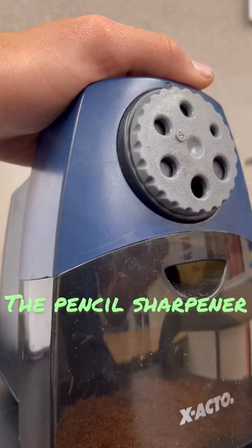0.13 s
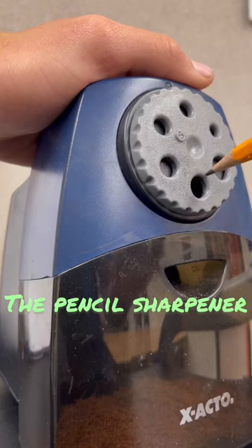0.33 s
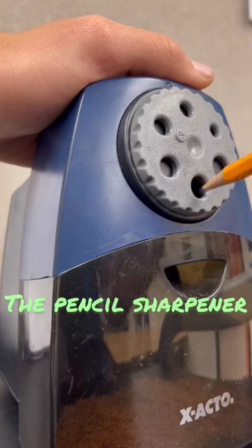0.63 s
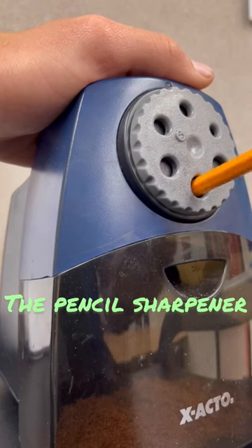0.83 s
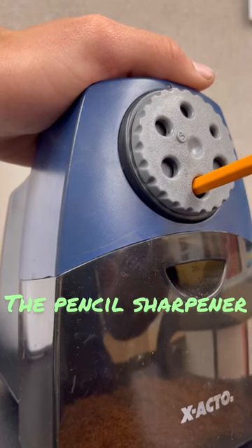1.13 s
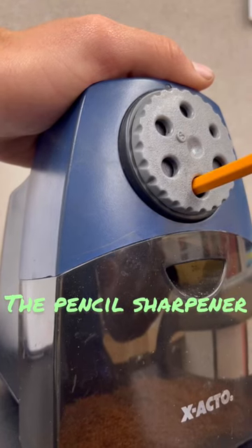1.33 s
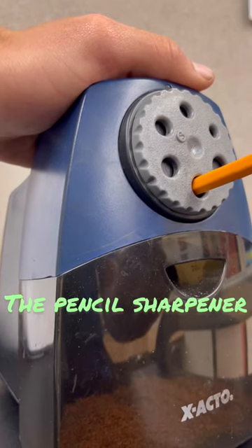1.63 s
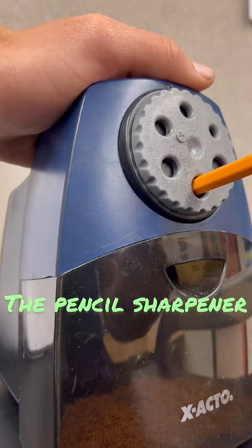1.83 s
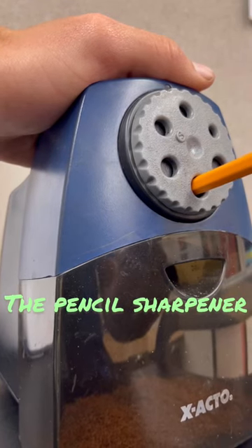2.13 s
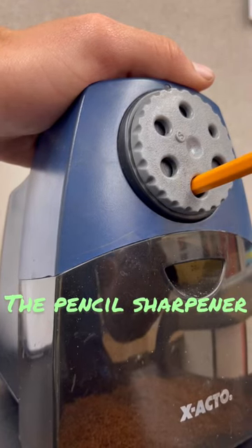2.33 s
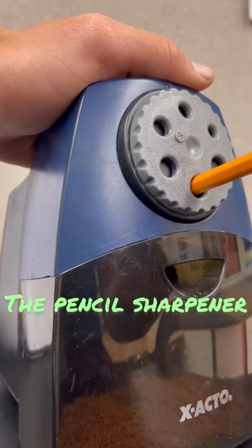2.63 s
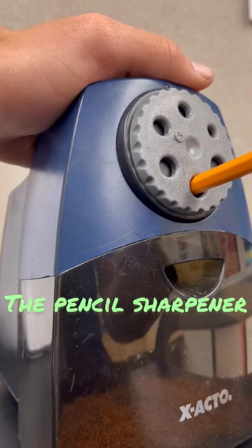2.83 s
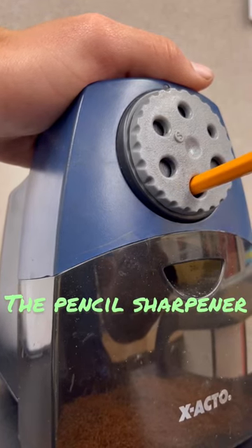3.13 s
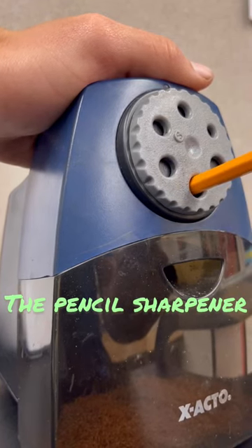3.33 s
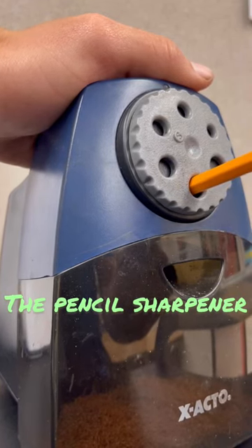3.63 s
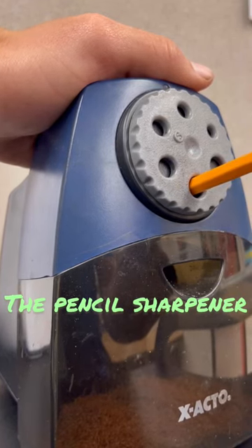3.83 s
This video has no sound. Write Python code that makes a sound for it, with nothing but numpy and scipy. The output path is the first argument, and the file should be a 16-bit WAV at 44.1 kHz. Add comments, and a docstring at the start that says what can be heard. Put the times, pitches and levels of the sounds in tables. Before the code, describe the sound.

An electric pencil sharpener taps, clicks on, then grinds a pencil loudly and steadily, close up

```python
"""An electric pencil sharpener, close to a pair of microphones in a quiet room.
A pencil taps the plastic dial, scrapes in and trips the switch: clicks ring damped sines and shape noise.
The motor hums as a wavering sine and the gears whine as resonant noise over a faint tooth-mesh tone.
The cutter circles about 7.7 times a second. Its flutes tear off chips, heard as showers of clicks,
and knock the plastic housing into resonance, harder on one side of every turn.
"""
import sys
import numpy as np
from scipy import signal
from scipy.fft import rfft, irfft
from scipy.io import wavfile

SR = 44100
rng = np.random.default_rng(int(sys.argv[2]) if len(sys.argv) > 2 else 0)


def output_pcm(signal):
    """Save a mono or channel-first signal as 16-bit PCM at the path in sys.argv[1].

    Samples are clipped to [-1, 1] before scaling.
    """
    pcm = np.clip(np.atleast_2d(signal).T, -1, 1) * 32767
    wavfile.write(sys.argv[1], SR, np.round(pcm).astype(np.int16))


N = 176400
TIME = np.arange(N) / SR
PAIR = (2, N)  # two rows per source: what both ports share, and what differs

# Room floor: (frequency [Hz], relative density [dB per Hz])
ROOM_TONE = [(15, -34), (25, -4), (140, -6), (182, -15), (244, -4), (271, -13), (616, -11), (703, -20),
             (940, -17.5), (2310, -52), (14000, -55)]
ROOM_TONE_DB = -59.5

# Pencil on plastic, then the switch:
# (time [s], relative level [dB], treble against middle [dB], bass against middle [dB])
TAP_EVENTS = [(0.34, -27.5, -10, 2), (0.513, -53.5, -14, 2), (.678, -39, -10, -5), (0.7546, -27, 8, -6),
              (0.7906, -26.5, 17.5, -6)]
# What a tap rings with: (frequency [Hz], relative level [dB], 60 dB decay [s])
TAP_MODES = [(290, -8.5, 0.12), (427, -6.5, .07), (610, 2, 0.075), (804, 5, 0.029), (1090, 5.5, 0.032),
             (1575, -3, 0.028), (1900, -0.5, 0.025), (2380, 2, 0.0082), (3600, -8, 0.0093)]
# Bright crack of plastic or wood: (frequency [Hz], relative level [dB])
CRACK = [(1500, -11), (3200, 2.5), (4700, -3), (7000, 0), (10000, 1.5), (13000, -16), (16000, -43)]
# Faint tail of a tap in the room: (frequency [Hz], relative level [dB])
ROOM_COLOUR = [(200, 7), (2200, -3), (3000, -23), (7500, -28), (12000, -40)]
TAP_BODY_DB, CRACK_DB, TAIL_DB = -27, -11.5, -18
CONTACT_T60_S, CRACK_T60_S, ROOM_T60_S = 0.045, 0.035, 0.25

SLIDE_FROM_S, SLIDE_TO_S, SLIDE_DB = 0.68, 0.80, -63.5

# Motor start, then the cutter's bite
MOTOR_ON_S, SPIN_UP_S, BITE_S, BITE_RISE_S = 0.776, 0.043, 0.854, 0.068
HUM_HZ, HUM_DB, SHAKE_DB = 67.3, -51.5, -56
JOLT_S, JOLT_LENGTH_S, JOLT_DB = 0.925, 0.045, 13  # the motor strains as the cutter bites

# Cutter speed: (time [s], rate [turns per s])
TURN_RATE = [(.8, 7.85), (1.4, 7.74), (2.0, 7.63), (3.0, 7.63), (3.5, 7.68), (4.0, 7.72)]
TURN_ANCHOR_S, TURNS_AT_ANCHOR = 1.0, -0.085  # the turn count at this time
# Source levels while cutting, before trim and swing:
# (time [s], housing level [dB], gears level [dB], rasp level [dB], chips level [dB])
LOAD = [(0.95, -20.5, -23.5, -23, -29), (1.05, -19.5, -28, -24, -31), (1.2, -21, -24, -21.5, -29.5),
        (1.35, -19.5, -25, -21, -25.5), (1.55, -21.5, -25.5, -21.0, -28.5), (1.75, -21.5, -20, -23, -30),
        (1.9, -22, -24.5, -21.5, -28.5), (2.05, -20.5, -24, -22.5, -30.5), (2.25, -20, -21, -23.5, -29),
        (2.45, -21, -27, -19, -27), (2.65, -20.5, -28, -22, -27.9), (2.85, -22, -26.5, -21, -29.5),
        (3.1, -20.5, -27.5, -23, -29.3), (3.35, -22, -27, -22, -31.5), (3.55, -23.4, -24.5, -24.5, -32.1),
        (3.75, -24.5, -25.5, -24, -32.5), (3.9, -23, -24.5, -24, -32.5), (4.0, -23, -26.5, -22.5, -31)]
# Swing within one turn: (position [share of a turn], cutting [dB], gears [dB], housing [dB])
TURN_SWING = [(.1, 3, 1.5, 3.5), (.25, 2.5, -5, 2), (.4, 1, -1.5, 3), (.57, -1, 4.5, 0.6),
              (.72, -3.5, -1, -0.3), (.87, 1.5, -1.5, 0.5)]
# How unevenly the pencil is cut: (time [s], cutting swing [share])
WOBBLE = [(1.0, 0.067), (1.5, 0.22), (2.0, 0.88), (2.65, 1.23), (3.2, 1.36), (4.0, 0.54)]
ROLLS_PER_TURN, ROLL_DB = 4.56, 1.2

GEAR_HZ, GEAR_WIDTH_HZ, TEETH_PER_TURN = 1215.4, 40, 140
WHINE_DB, MESH_DB, GEARS_IDLE_DB = -2.5, -10.5, -15

FLUTES_PER_TURN, FLUTE_JITTER, FLUTE_SPREAD_DB = 56, 0.3, 2.5  # jitter in flute spacings

# Housing resonances: (frequency [Hz], width [Hz], relative level [dB])
HOUSING_MODES = [(118, 28, -15), (170.3, 12, -3.5), (193.6, 9.8, 3), (201.2, 14.8, 0), (231, 41, -3.5),
                 (274, 34, -3), (318.5, 18, -4.5), (354.5, 14.7, -2), (446, 67, -10.5), (594.3, 31, -4.5),
                 (843, 47, -12.5)]
# Lowest housing resonances: (time [s], added level [dB])
BOOM = [(1.0, -2.5), (1.7, 0.5), (2.1, 1.5), (2.8, 5), (3.3, 2.5), (3.7, -4)]
BOOM_BELOW_HZ, HOUSING_DB, HOUSING_IDLE_DB = 210, -2.5, -9.5

# Wood rasping through the case: (frequency [Hz], relative density [dB per Hz])
RASP = [(400, -20), (700, -3.5), (1000, -1), (1400, -12), (1650, -5.5), (1830, -3), (1920, 5), (2050, -4),
        (2330, 1), (2550, -8), (2750, -14.5), (3050, -6.5), (3800, -17.5), (5000, -23.5), (9000, -78)]
# Bright chips at the opening: (frequency [Hz], relative density [dB per Hz])
CHIPS = [(2500, -17), (4300, -3), (4800, -3), (5500, 0), (6100, -3), (7000, 1.5), (8500, -2.5), (10000, -1),
         (11200, -6), (12000, -12), (13000, -12.5), (13600, -35), (15000, -25.5)]
RASP_DB, CHIPS_DB, CUTTER_IDLE_DB = -2, -0.5, -15
CHIPS_PER_S, CHIP_SPREAD_DB, FLUTE_T60_S = 14000, 2.0, 0.028
CASE_ECHO_DB, CASE_T60_S = -8, 0.062

# Larger splinters breaking off: (time [s], relative level [dB])
SPLINTER_EVENTS = [(0.885, -20), (0.891, -17), (.926, -17), (2.202, -14.5), (1.207, -13), (2.431, -19),
                   (2.951, -12.5), (3.781, -18), (3.861, -21)]
SPLINTER_T60_S, SPLINTER_CRACK_DB, SPLINTER_BODY_DB = 0.038, -4.5, -5.5

# Phase between the microphone ports: (frequency [Hz], left lead [radians])
PORT_PHASE = [(60, .1), (330, .8), (450, -1.2), (620, -3.1), (900, -4.2), (1100, -2.3), (1220, -.6),
              (2000, 0), (2350, .7), (3200, 0), (4100, 1.4), (4800, 3.1), (5750, 6.2), (6300, 6.35),
              (8300, 8.7), (8800, 9.35), (9400, 9.5), (11700, 12.4), (13200, 12.6), (14000, 14.8)]
# Likeness of left and right: (frequency [Hz], likeness [0 to 1])
PORT_LIKENESS = [(70, .96), (150, .82), (340, .88), (650, .65), (850, .35), (1220, .6), (1450, .35),
                 (1950, .92), (2400, .78), (2900, .2), (4000, .4), (4900, .82), (6000, .92), (7500, .84),
                 (9000, .99), (10800, .8), (12500, .98)]
CUTOFF_HZ = 15400


def from_db(db):
    """Decibels to gain."""
    return 10 ** (np.asarray(db) / 20)


def rms_one(x):
    """Scale to rms 1."""
    return x / np.sqrt(np.mean(x ** 2) + 1e-20)


def in_time(rows):
    """Each column of a curve at every sample."""
    s, *columns = np.transpose(rows)
    return [np.interp(TIME, s, column) for column in columns]


def at_hz(points):
    """A table read on a log frequency axis at every bin of a 2 N transform."""
    hz, value = np.transpose(points)
    bin_hz = np.arange(N + 1) * SR / (2 * N)
    return np.interp(np.log(bin_hz + 1), np.log(hz), value)


def drift(rate):
    """Slow chance with spread 1; a higher rate wavers faster."""
    step = 40  # samples between computed points
    r = np.exp(-2 * step * np.pi * rate / SR)
    chance = rng.standard_normal(N // step + 2002)
    slow = signal.lfilter([1], [1, -2 * r, r * r], chance)[2000:]  # drop the filter's start
    return np.interp(np.arange(N) / step, np.arange(len(slow)), rms_one(slow))


def colour(x, spectrum):
    """Causal (minimum-phase) filter with the given spectrum."""
    cepstrum = irfft(np.log(from_db(at_hz(spectrum))))
    cepstrum[1:N] *= 2
    cepstrum[N + 1:] = 0
    response = np.exp(rfft(cepstrum))
    return irfft(rfft(x, 2 * N) * response)[..., :N]


def noise(spectrum):
    """Coloured noise with rms 1."""
    return rms_one(colour(rng.standard_normal(PAIR), spectrum))


def resonate(x, hz, width_hz):
    """Resonance with gain 1 on top."""
    r = np.exp(-np.pi * width_hz / SR)
    top = np.array([1, 0, -1]) * (1 - r * r) / 2
    return signal.lfilter(top, [1, -2 * r * np.cos(2 * np.pi * hz / SR), r * r], x + 1e-18)


def ring(x, hz, t60):
    """A unit click sets a dying sine of height 1 ringing."""
    r = from_db(-60 / (t60 * SR))
    w = 2 * np.pi * hz / SR
    return signal.lfilter([0, np.sin(w)], [1, -2 * r * np.cos(w), r * r], x + 1e-18)


def fade(x, t60):
    """Each click becomes a dying envelope."""
    return signal.lfilter([1], [1, -from_db(-60 / (t60 * SR))], x + 1e-18)


def clicks(s, sizes):
    """Clicks of the given sizes at the given times."""
    samples = np.clip(s * SR, 0, N).astype(int)
    return np.bincount(samples, sizes, N + 1)[:N]


def burst(s, db, t60):
    """Envelope of sudden events that die away."""
    return fade(clicks(s, from_db(db)), t60)


def room_floor():
    """The quiet room is steady noise, strongest in the bass."""
    return from_db(ROOM_TONE_DB) * noise(ROOM_TONE)


def taps():
    """Each tap is a brief chatter that rings the plastic, with a bright crack and a faint room tail."""
    s, db, treble_db, bass_db = np.transpose(TAP_EVENTS)
    chatter = rng.standard_normal(PAIR)
    body = np.zeros(PAIR)
    for k, (hz, mode_db, t60) in enumerate(TAP_MODES):
        contact = burst(s, db + mode_db + bass_db * (hz < 900), CONTACT_T60_S)
        body += (-1) ** k * ring(chatter * contact, hz, t60)  # neighbouring modes in opposite sense
    crack = burst(s, db + treble_db + CRACK_DB, CRACK_T60_S) * noise(CRACK)
    tail = burst(s, db + TAIL_DB, ROOM_T60_S) * noise(ROOM_COLOUR)
    return from_db(TAP_BODY_DB) * body + crack + tail


def slide():
    """The pencil going in scrapes faintly: bright noise of flickering level."""
    sliding = (TIME > SLIDE_FROM_S) * (TIME < SLIDE_TO_S)
    return from_db(SLIDE_DB + 1.4 * drift(40)) * noise(CRACK) * sliding


def engage(idle_db):
    """The motor spins up to an idle level, then the bite brings that level to the cutting one."""
    spin = np.clip((TIME - MOTOR_ON_S) / SPIN_UP_S, 0, 1)
    bite = np.clip((TIME - BITE_S) / BITE_RISE_S, 0, 1)
    return spin * from_db(idle_db * (1 - bite))


def motor():
    """A low wavering hum and a noisy shake swell briefly as the motor strains."""
    strain_db = JOLT_DB * np.exp(-((TIME - JOLT_S) / JOLT_LENGTH_S) ** 2)
    hum = rms_one(np.sin(2 * np.pi * HUM_HZ * TIME + 0.56 * drift(3)))
    hum = hum * [[1], [0]]  # in the shared row only
    shake = rms_one(resonate(rng.standard_normal(PAIR), hz=63.4, width_hz=53))
    sound = from_db(HUM_DB + 2 * drift(5.3)) * hum + from_db(SHAKE_DB) * shake
    return sound * from_db(strain_db) * engage(idle_db=2)


def gears(turns, level_db):
    """Teeth mesh at a wavering pitch and their rattle rings the gearbox."""
    mesh = rms_one(np.sin(2 * np.pi * TEETH_PER_TURN * turns + 1.68 * drift(6.4)))
    mesh = mesh * [[1], [0]]  # in the shared row only
    rattle = resonate(rng.standard_normal(PAIR), GEAR_HZ, GEAR_WIDTH_HZ)
    whine = rms_one(resonate(rattle, GEAR_HZ, width_hz=500))
    sound = from_db(MESH_DB) * mesh + from_db(WHINE_DB) * whine
    return sound * from_db(level_db) * engage(GEARS_IDLE_DB)


def flute_strikes(turns):
    """The cutter's flutes meet the wood, uneven in time and force."""
    timing, force = rng.standard_normal((2, 2400))
    at_turn = turns[0] + (np.arange(len(timing)) + FLUTE_JITTER * timing) / FLUTES_PER_TURN
    s = np.interp(at_turn, turns, TIME, right=TIME[-1] + 1)  # strikes past the end fall away
    return clicks(s, from_db(FLUTE_SPREAD_DB * np.clip(force, -2, 2)))


def housing(strikes, level_db):
    """The strikes jolt the plastic shell to and fro and excite its resonances."""
    knocks = strikes * rng.choice([-1, 1], PAIR)
    boom_db = in_time(BOOM)[0]
    shell = np.zeros(PAIR)
    for k, (hz, width_hz, db) in enumerate(HOUSING_MODES):
        mode_db = db + boom_db * (hz < BOOM_BELOW_HZ)
        shell += (-1) ** k * from_db(mode_db) * resonate(knocks, hz, width_hz)
    shell = signal.sosfilt(signal.butter(2, [90, 1100], "band", fs=SR, output="sos"), shell)
    return from_db(HOUSING_DB + level_db) * rms_one(shell) * engage(HOUSING_IDLE_DB)


def fractures(strikes):
    """Every strike tears off a short shower of tiny chips."""
    sizes_db = CHIP_SPREAD_DB * np.minimum(rng.exponential(1, PAIR), 4)
    sizes = from_db(sizes_db) * rng.choice([-1, 1], PAIR)
    happens = rng.random(PAIR) < CHIPS_PER_S / SR
    return sizes * happens * fade(strikes, FLUTE_T60_S)


def case(x):
    """Sound bounces about inside the shavings bin, which ripples its spectrum."""
    dying = from_db(-60 * TIME / CASE_T60_S) * (TIME > 0.002)
    echoes = rms_one(rng.standard_normal(N) * dying) / np.sqrt(N)  # energy 1
    reflected = irfft(rfft(x, 2 * N) * rfft(echoes, 2 * N))[:, :N]
    return rms_one(x + from_db(CASE_ECHO_DB) * reflected)


def cutter(strikes, rasp_db, chips_db):
    """Tearing wood: a rasp through the case and a bright crackle from the opening."""
    rasp = case(colour(fractures(strikes), RASP))
    rasp = from_db(RASP_DB + rasp_db + 1.75 * drift(36)) * rasp
    chips = case(colour(fractures(strikes), CHIPS))
    chips = from_db(CHIPS_DB + chips_db + 2.4 * drift(23)) * chips
    return (rasp + chips) * engage(CUTTER_IDLE_DB)


def splinters():
    """A splinter snaps with a bright crack and a rasp through the case."""
    s, db = np.transpose(SPLINTER_EVENTS)
    crack = from_db(SPLINTER_CRACK_DB) * noise(CRACK)
    body = from_db(SPLINTER_BODY_DB) * noise(RASP)
    return burst(s, db, SPLINTER_T60_S) * (crack + body)


def microphones(pair):
    """Sound reaches the two ports out of step, and alike only in part."""
    alike = np.clip(at_hz(PORT_LIKENESS), 0, 0.995)
    sides = np.array([[1], [-1]])  # left, right
    shared, differing = rfft(pair, 2 * N)
    ports = shared * np.sqrt((1 + alike) / 2) + sides * differing * np.sqrt((1 - alike) / 2)
    lead = np.exp(0.5j * at_hz(PORT_PHASE) * sides)  # half the phase on each side
    return irfft(ports * lead)[:, :N]


def scene():
    """One cutter speed drives the strikes, the gear mesh and the swing of the cutting levels."""
    turns = np.cumsum(in_time(TURN_RATE)[0]) / SR
    turns = turns - np.interp(TURN_ANCHOR_S, TIME, turns) + TURNS_AT_ANCHOR
    share, *swings = np.transpose(TURN_SWING)
    cut_swing, gear_swing, housing_swing = [np.interp(turns, share, c, period=1) for c in swings]
    housing_db, gears_db, rasp_db, chips_db = in_time(LOAD)
    roll_db = ROLL_DB * np.cos(2 * np.pi * ROLLS_PER_TURN * turns)
    cut_db = in_time(WOBBLE)[0] * cut_swing + roll_db
    strikes = flute_strikes(turns)

    machine = motor() + gears(turns, gears_db + gear_swing)
    machine += housing(strikes, housing_db + housing_swing)
    machine += cutter(strikes, rasp_db + cut_db, chips_db + 0.94 * cut_db)
    return microphones(room_floor() + taps() + slide() + machine + splinters())


def record(dry):
    """The deepest bass and the top are cut."""
    dry = signal.sosfilt(signal.butter(2, 45, "high", fs=SR, output="sos"), dry)
    # 70 dB down from 700 Hz above the cutoff
    return signal.sosfilt(signal.cheby2(16, 70, CUTOFF_HZ + 700, fs=SR, output="sos"), dry)


dry = scene()
out = record(dry)
output_pcm(out)
```